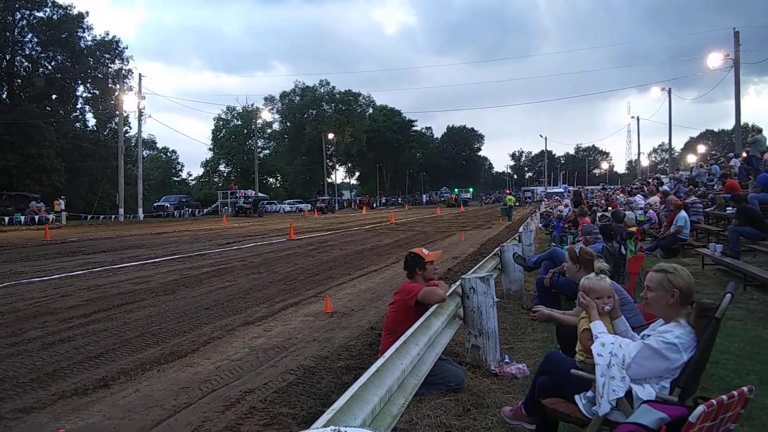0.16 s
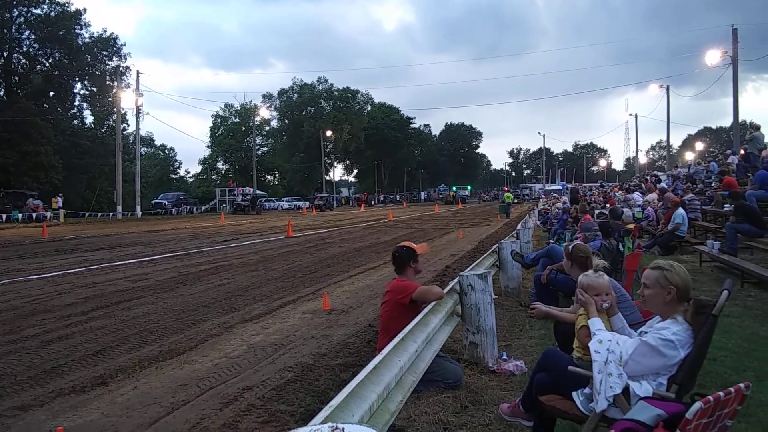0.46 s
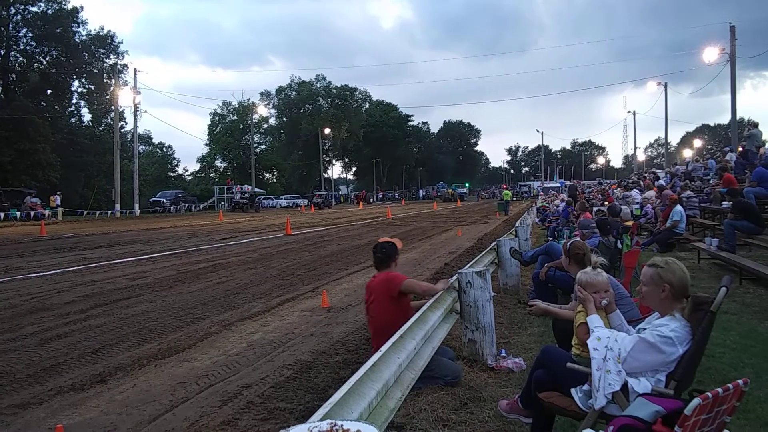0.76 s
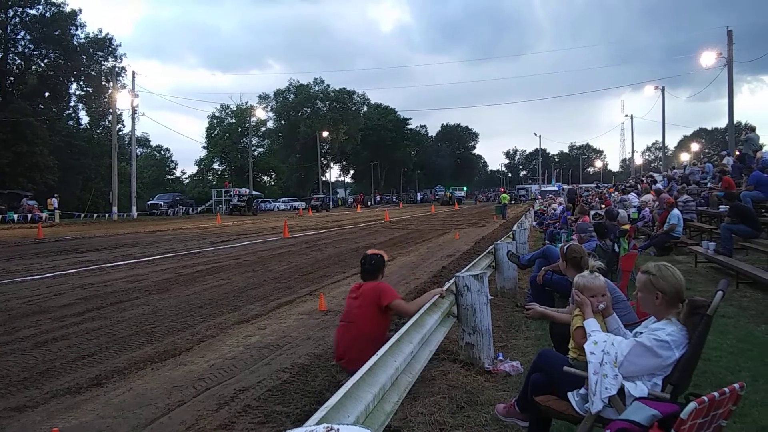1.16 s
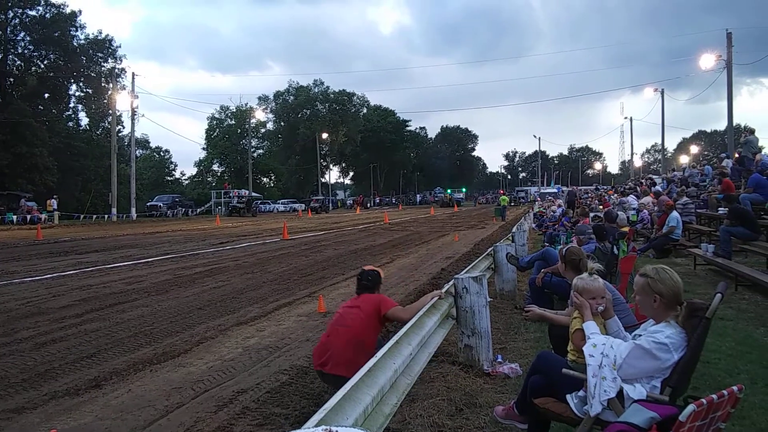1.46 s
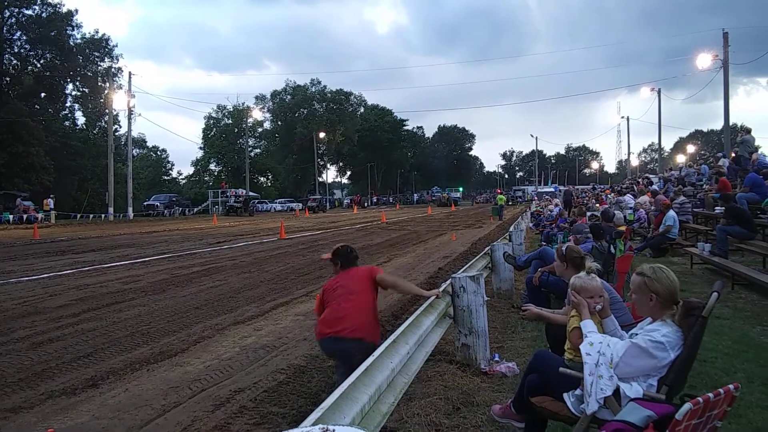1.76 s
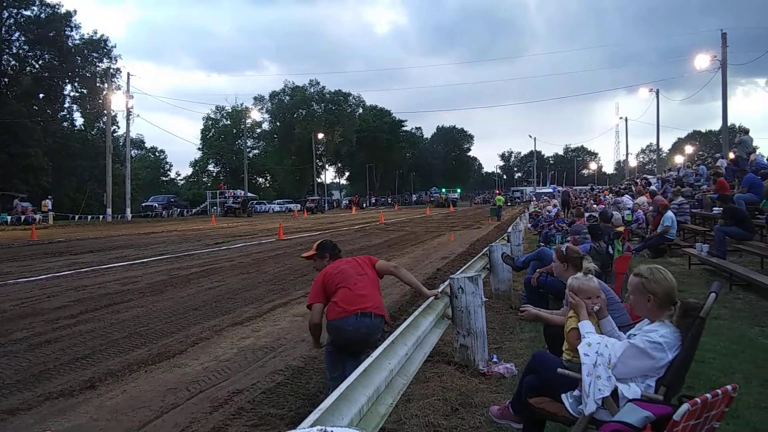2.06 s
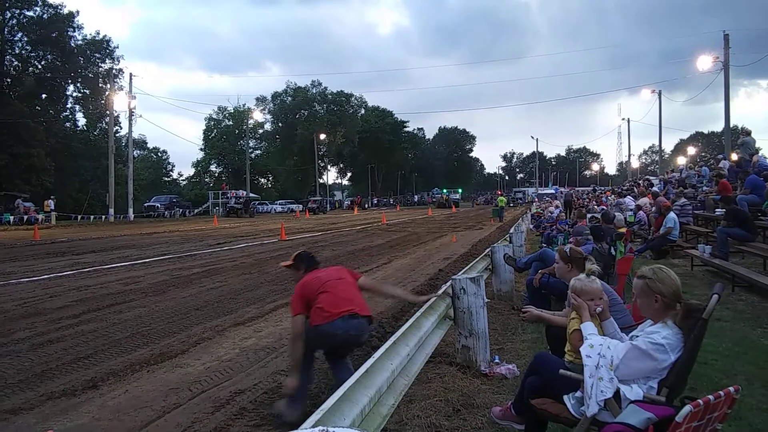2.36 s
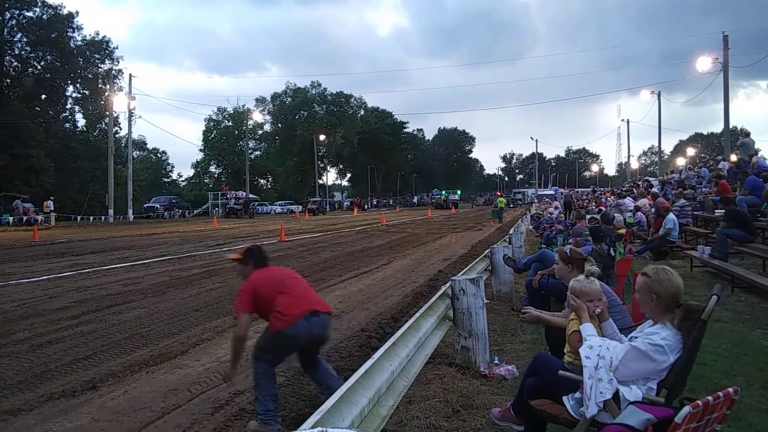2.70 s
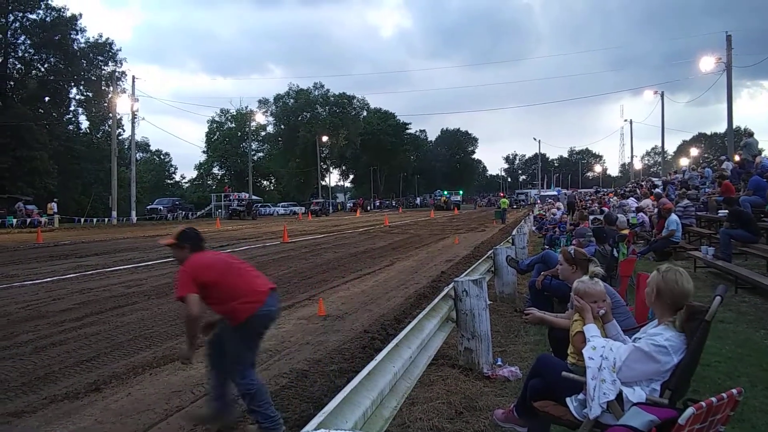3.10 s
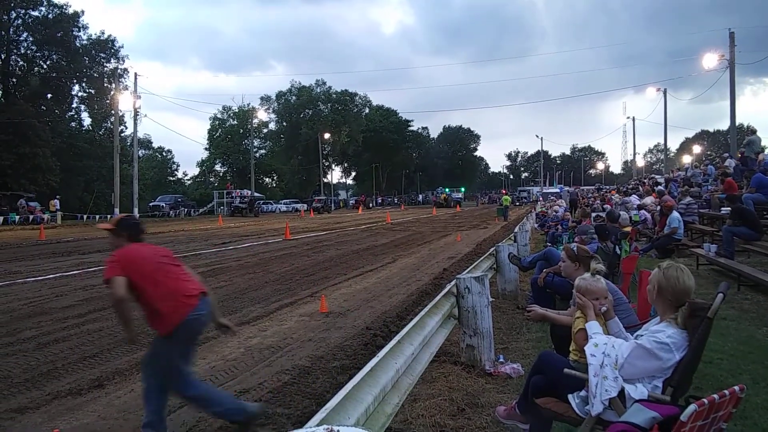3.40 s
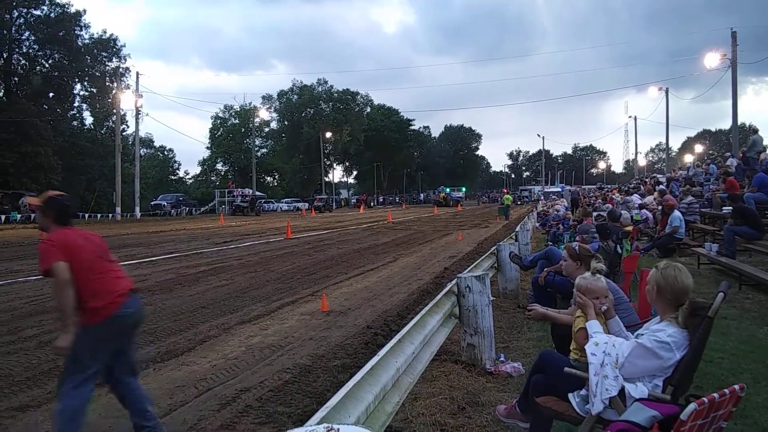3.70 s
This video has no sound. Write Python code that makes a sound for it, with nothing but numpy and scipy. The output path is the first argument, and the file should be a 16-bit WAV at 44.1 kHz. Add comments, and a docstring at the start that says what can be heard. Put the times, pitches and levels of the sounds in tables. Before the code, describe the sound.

A pulling truck's V8 roars continuously at very high revs, harsh and buzzing with dense hiss; pitch sags, surges midway, then droops. Outdoor dirt track, distant source but very loud, the microphone beside the stands, peaks flattened.

```python
"""A pulling truck's V8 at the far end of a dirt track: it sags for 1.5 s, surges by 2.8 s, then sags again.
Throughout, unevenly timed firings give a stack of exhaust tones and a rasp of sharp cracks.
Echoed gas hiss pulses below and spits above; its colour shifts from 2 to 3 s while bands of sizzle sink.
A low rumble comes up underneath after the start. A fast limiter flattens the peaks."""
import sys
import numpy as np
from scipy import signal
from scipy.fft import rfft, irfft
from scipy.io import wavfile
from scipy.ndimage import uniform_filter1d, minimum_filter1d

SR = 44100
rng = np.random.default_rng(int(sys.argv[2]) if len(sys.argv) > 2 else 0)


def generate_wav(sig):
    """Save sig (samples, or channels by samples) to the path in sys.argv[1] as 16-bit PCM at SR."""
    pcm = np.round(np.clip(np.atleast_2d(sig).T, -1, 1) * 32767).astype(np.int16)
    wavfile.write(sys.argv[1], SR, pcm)


N = 169785

# cylinders in firing order: relative strength/dB, lateness/firing interval
CYLINDERS = [(-2.5, -0.084), (-3.5, 0.07), (1, -0.052), (-1.2, -0.028), (-0.5, 0.084), (2, -0.0086),
             (-0.5, -.05), (0.8, 0.049)]
TONE_DRIFT_DB = 2.5


def amp(db):
    """Decibels to gain."""
    return 10 ** (np.asarray(db) / 20)


def unit(x):
    """Scale to an rms of one."""
    return x / np.sqrt(np.mean(abs(x) ** 2) + 1e-20)


def curve(rows, column=1):
    """Interpolate one column over time, at every sample."""
    rows = np.array(rows)
    return np.interp(np.arange(N) / SR, rows[:, 0], rows[:, column])


def colour(points, hz):
    """Gain of a spectrum at the given frequencies, linear in dB over log frequency."""
    f, db = np.transpose(points)
    return amp(np.interp(np.log(hz + 1), np.log(f), db))


def shaped(x, points):
    """Filter x by a spectrum."""
    return irfft(rfft(x) * colour(points, np.fft.rfftfreq(N, 1 / SR)), N)


def wander(rate_hz):
    """Smooth random drift of rms one, up to about the given rate."""
    size = 2048
    hz = np.fft.rfftfreq(size, N / SR / size)
    spectrum = rfft(rng.standard_normal(size)) * np.exp(-(hz / rate_hz) ** 2)
    slow = unit(irfft(spectrum))
    return np.interp(np.linspace(0, size - 1, N), np.arange(size), slow)


def engine_cycles():
    """Engine cycles run so far: the integral of the cycle rate under load, plus a slight jitter."""
    # t/s, cycle rate/Hz (one cycle = two crank turns = eight firings)
    cycle_rate = [(0.0, 54.02), (0.21, 53.86), (0.44, 53.15), (0.55, 53.11), (0.9, 51.66), (1.06, 49.92),
                  (1.22, 49.4), (1.5, 48.27), (1.61, 48.86), (1.8, 53.6), (1.89, 54.4), (2.05, 54.58),
                  (2.24, 57.3), (2.28, 57.32), (2.51, 55.45), (2.73, 58.43), (2.8, 57.8), (2.89, 57.04),
                  (2.97, 56.85), (3.18, 57.5), (3.27, 56.82), (3.41, 54.53), (3.74, 52.26), (3.85, 51.56)]
    jitter_cycles, jitter_hz = 0.002, 8.1
    return 1 + np.cumsum(curve(cycle_rate)) / SR + jitter_cycles * wander(jitter_hz)


def tone(cycles, multiple, db, drift_db):
    """One multiple of the cycle rate, drifting and fluttering in the open air."""
    drift_hz, flutter_hz = 6.5, 17.3
    flutter = 0.13  # rms: radians of phase, and share of amplitude
    phase = 2 * np.pi * (multiple * cycles + rng.random()) + flutter * wander(flutter_hz)
    level = np.sqrt(2) * amp(db + drift_db * wander(drift_hz))
    return level * (1 + flutter * wander(flutter_hz)) * np.cos(phase)


def exhaust_tones(cycles):
    """The firing tone (8), its octave (16) and the other cycle multiples that uneven firing adds."""
    # swelling tones, named by multiple of the cycle rate: t/s, level/dB
    tone_5 = [(0, -43.5), (.85, -41), (1.05, -51), (2.1, -46), (2.9, -36.5), (3.85, -44.5)]
    firing_tone = [(0, -17), (.2, -17), (.9, -26), (1.15, -22), (1.75, -25), (1.93, -17), (2.2, -23.5),
                   (2.5, -19.5), (2.88, -20.5), (3.12, -27), (3.85, -22.5)]
    tone_9 = [(0, -26.5), (1, -41), (2.8, -34.5), (3.85, -42)]
    tone_11 = [(0, -27), (.25, -32.5), (.65, -23.5), (1.05, -32.5), (1.35, -28.5), (1.65, -34.5),
               (2, -26.5), (2.25, -30), (2.7, -19.5), (3.05, -22.5), (3.5, -17), (3.85, -34)]
    tone_12 = [(0, -24.5), (.35, -26), (.78, -40), (1, -27), (1.4, -33.5), (3.2, -29.5), (3.65, -25.5),
               (3.85, -29)]
    tone_13 = [(0, -18), (.4, -21), (.75, -25), (1.35, -27.5), (1.7, -25.5), (2.05, -22), (2.3, -27),
               (2.8, -23.5), (3.4, -18.5), (3.85, -20)]
    tone_14 = [(.45, -50), (.75, -34), (2.2, -32.5), (3.85, -35)]
    firing_octave = [(0, -25.5), (.45, -21.5), (2, -21), (2.2, -28), (2.7, -33), (3.85, -36)]
    tone_17 = [(0, -41), (.45, -31), (1.3, -37), (1.85, -43), (2.25, -26), (2.6, -33), (3.15, -21.5),
               (3.5, -31), (3.85, -26)]
    tone_18 = [(0, -37), (2.9, -29.5), (3.35, -31), (3.7, -43)]
    tone_19 = [(0, -25), (.55, -34.5), (.8, -20), (1.1, -21), (1.45, -32), (1.95, -36), (2.3, -21.5),
               (2.7, -26.5), (3.1, -18.5), (3.4, -26.5), (3.7, -18.5), (3.85, -19)]
    tone_20 = [(0, -29.5), (.45, -24.5), (1.4, -27), (2.1, -37), (3.1, -32), (3.4, -25), (3.85, -27)]
    # weaker tones: multiple of the cycle rate, mid-run level/dB, trend/(dB/s)
    weak_tones = [(3, -55, 0.5), (6, -48, -1.5), (7, -43, 1.5), (10, -40, 2.5), (15, -40, -6.5),
                  (21, -37.5, -3.5), (23, -38.5, -0.5), (25, -42, -3.5)]
    swelling = {5: tone_5, 8: firing_tone, 9: tone_9, 11: tone_11, 12: tone_12, 13: tone_13,
                14: tone_14, 16: firing_octave, 17: tone_17, 18: tone_18, 19: tone_19, 20: tone_20}
    swelling_drift_db = 1.56
    from_middle_s = (np.arange(N) - N / 2) / SR
    out = np.zeros(N)
    for multiple, level in swelling.items():
        out += tone(cycles, multiple, curve(level), swelling_drift_db)
    for multiple, db, trend in weak_tones:
        out += tone(cycles, multiple, db + trend * from_middle_s, TONE_DRIFT_DB)
    return out


def upper_tones(cycles):
    """Single high multiples of the cycle rate swell out of the rasp and fade as the truck moves."""
    # multiple of the cycle rate, t of peak/s, peak level/dB
    peaks = [(47, 0.69, -27.5), (55, 0.74, -30), (36, 1.4, -28.5), (35, 2.1, -28), (44, 2.34, -25.5),
             (39, 2.84, -29)]
    swell_s = 0.55  # from the peak to 3 dB down
    t = np.arange(N) / SR
    out = np.zeros(N)
    for multiple, peak_s, db in peaks:
        swell = 1 / np.hypot(1, (t - peak_s) / swell_s)
        out += tone(cycles, multiple, db, TONE_DRIFT_DB) * swell
    return out


def rasp(cycles):
    """One sharp crack per firing, early or late by cylinder; the pipe delays its treble."""
    # f/Hz, relative gain/dB
    rasp_spectrum = [(800, -27.5), (1200, -2.5), (1500, -8.5), (1850, 1), (2500, 4.1), (3100, 1),
                     (3550, -17.5), (4600, -16.5), (8000, -39.5)]
    # t/s, relative level/dB
    rasp_level = [(0, -4), (.35, -1), (1, 0.5), (1.6, 1.5), (2.3, 0.5), (2.8, -2.5), (3.85, 1.5)]
    rasp_db = -18.5
    late_drift, late_drift_hz, late_scatter = .011, 4, .008  # drift and scatter in firing intervals
    crack_scatter_db = 1.1
    smear_s, smear_hz = 0.001195, 1993  # delay grows by smear_s per smear_hz
    firings = cycles * len(CYLINDERS)
    cracks = np.zeros(N)
    for place, (db, lateness) in enumerate(CYLINDERS):
        late = lateness + late_drift * wander(late_drift_hz)
        due = place + len(CYLINDERS) * np.arange(SR // 180)  # more cycles than the run needs
        scatter, strength = rng.standard_normal((2, len(due)))
        at = np.interp(due + late_scatter * scatter, firings - late, np.arange(N))
        at = np.round(at).astype(int)
        inside = (at > 0) & (at < N - 1)
        cracks[at] += amp(db + crack_scatter_db * strength) * inside
    hz = np.fft.rfftfreq(N, 1 / SR)
    smear = np.exp(-1j * np.pi * hz ** 2 * smear_s / smear_hz)
    piped = irfft(rfft(cracks) * colour(rasp_spectrum, hz) * smear, N)
    return amp(rasp_db) * unit(piped) * unit(amp(curve(rasp_level)))


def hiss(pulsing, spitting):
    """Gas noise, pulsing below and spitting above, whose colour shifts as the truck moves."""
    # early and late spectra: f/Hz, relative density/dB
    early_spectrum = [(100, -36), (300, -17), (450, -9), (700, -2.5), (1050, -5), (1450, -8), (1850, -2),
                      (2550, -0.5), (3130, -1.5), (3480, -15), (4000, -12), (4330, -2.5), (4700, -5),
                      (5400, -3.5), (5900, 2.5), (6600, 2), (7300, -2.5), (8400, -20.5), (11700, -21),
                      (14300, -44), (15500, -42)]
    late_spectrum = [(100, -28), (300, -25), (450, -2.5), (700, -3.5), (1050, -1.5), (1450, -6.5),
                     (1850, 3), (2450, -1), (3130, -2.5), (3480, -15), (4000, -11), (4700, -5), (5350, 1.5),
                     (5950, 4), (6650, 1.5), (7200, -8.5), (8400, -19), (12200, -26.5), (14300, -43),
                     (15500, -37)]
    # t/s, relative level/dB
    hiss_level = [(0.0, -18), (0.3, -14), (1.58, -12), (3.8, -14.5), (3.85, -16)]
    # sizzle bands: t/s, centre f/Hz, relative density/dB
    first_sizzle = [(0, 12100, -25.5), (1.25, 11640, -21.5), (1.6, 11000, -31), (2.15, 10800, -15.5),
                    (2.7, 9800, -18.5), (3.2, 9846, -20), (3.85, 9167, -24)]
    second_sizzle = [(1.9, 13500, -45), (2.7, 12700, -27), (3.85, 11910, -20)]
    change_s = 2.07, 3  # start and end of the colour shift
    offset_db, split_hz = -1.5, 3450
    low = signal.butter(4, split_hz, "low", fs=SR, output="sos")
    high = signal.butter(4, split_hz, "high", fs=SR, output="sos")
    gas = signal.sosfilt(low, rng.standard_normal(N) * pulsing)
    gas += signal.sosfilt(high, rng.standard_normal(N) * spitting)
    late = np.interp(np.arange(N) / SR, change_s, [0, 1])
    body = (1 - late) * shaped(gas, early_spectrum) + late * shaped(gas, late_spectrum)
    body += sizzle(first_sizzle, spitting) + sizzle(second_sizzle, spitting)
    return amp(offset_db + curve(hiss_level)) * unit(body)


def bursts(cycles):
    """Envelope of one gas swell per firing, strong or weak by cylinder."""
    depth, scatter_db = 0.36, 0.3
    firings = cycles * len(CYLINDERS)
    index = firings.astype(int)
    burst_db = np.take(np.array(CYLINDERS)[:, 0], index, mode="wrap")
    burst_db = burst_db + scatter_db * rng.standard_normal(N)[index]
    strength = uniform_filter1d(amp(burst_db), size=50)  # softens the steps
    return unit(strength * (1 - depth * np.cos(2 * np.pi * firings)))


def spits(cycles):
    """Treble envelope: an uneven pattern that repeats each cycle and slowly changes, plus flutter."""
    spit_db, spit_drift_hz = 2.5, 2.4
    flutter_db, flutter_hz = 0.46, 26
    pattern = np.zeros(N)
    for k in range(1, 21):
        phase = 2 * np.pi * k * cycles
        wave = wander(spit_drift_hz) * np.cos(phase) + wander(spit_drift_hz) * np.sin(phase)
        pattern += wave / k ** 0.28
    return unit(amp(spit_db * unit(pattern) + flutter_db * wander(flutter_hz)))


def sizzle(band, spitting):
    """Spitting noise, low-passed around a carrier that sinks through the top octave."""
    half_width_hz = 770
    carrier = np.exp(2j * np.pi * np.cumsum(curve(band)) / SR)
    narrow = signal.butter(3, half_width_hz, fs=SR, output="sos")
    base = signal.sosfilt(narrow, rng.standard_normal(N) * spitting / carrier)
    return 2 * amp(curve(band, 2)) * (carrier * base).real


def grounds(x):
    """Add sparse, decaying echoes from the stands and the trees."""
    echo_db, t60_s = -11, 0.29
    t = np.arange(SR // 2) / SR
    sparse = rng.standard_normal(len(t)) * (rng.random(len(t)) < .05)
    taps = sparse * np.exp(-np.log(1000) * t / t60_s)
    echo = signal.fftconvolve(x, taps / np.linalg.norm(taps))[:N]
    return x + amp(echo_db) * echo


def ground_rumble():
    """Low rumble of the grounds: noise shaped by a spectrum, then by a level curve."""
    # f/Hz, relative density/dB
    rumble_spectrum = [(15, -6), (50, 2.5), (90, 0.5), (170, 3.5), (300, 4), (600, 4.5), (2000, -50)]
    # t/s, level/dB
    rumble_level = [(0, -51), (1.3, -42), (2.4, -38.5), (3.3, -40), (3.47, -34), (3.65, -40), (3.85, -41)]
    noise = shaped(rng.standard_normal(N), rumble_spectrum)
    return amp(curve(rumble_level)) * unit(noise)


def scene():
    """Exhaust tones, rasp and echoed hiss, all timed by one engine, over the rumble."""
    cycles = engine_cycles()
    tones = exhaust_tones(cycles) + upper_tones(cycles)
    echoed_hiss = grounds(hiss(bursts(cycles), spits(cycles)))
    return (tones + rasp(cycles) + echoed_hiss + ground_rumble())[None]


def record(dry):
    """A fast limiter holds peaks under the ceiling; a steep low-pass follows."""
    ceiling, edge_hz = 0.67, 15780
    gain = minimum_filter1d(ceiling / np.maximum(abs(dry), ceiling), size=11)
    smooth_gain = uniform_filter1d(uniform_filter1d(gain, size=7), size=5)
    low_pass = signal.firwin(1023, edge_hz, window=("kaiser", 9), fs=SR)
    return signal.oaconvolve(dry * smooth_gain, low_pass[None], "same")


dry = scene()
out = record(dry)
generate_wav(out)
```